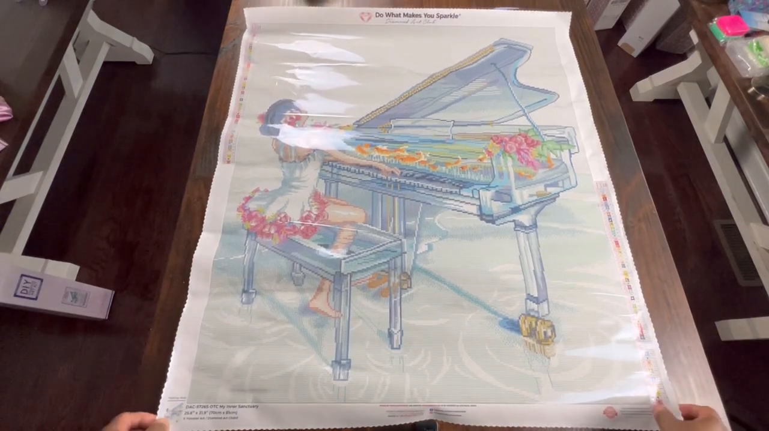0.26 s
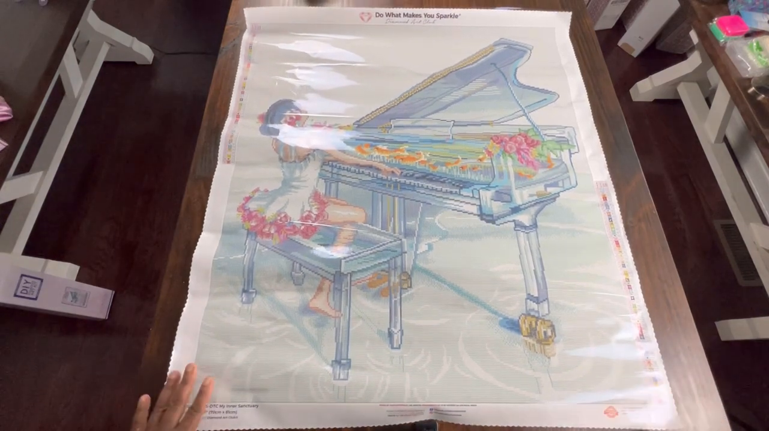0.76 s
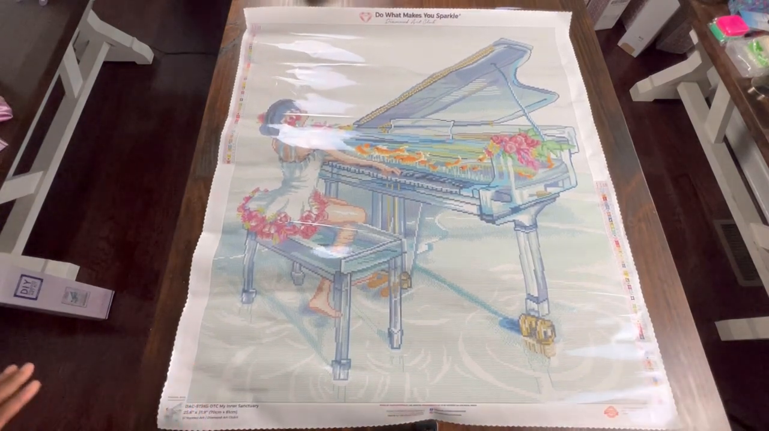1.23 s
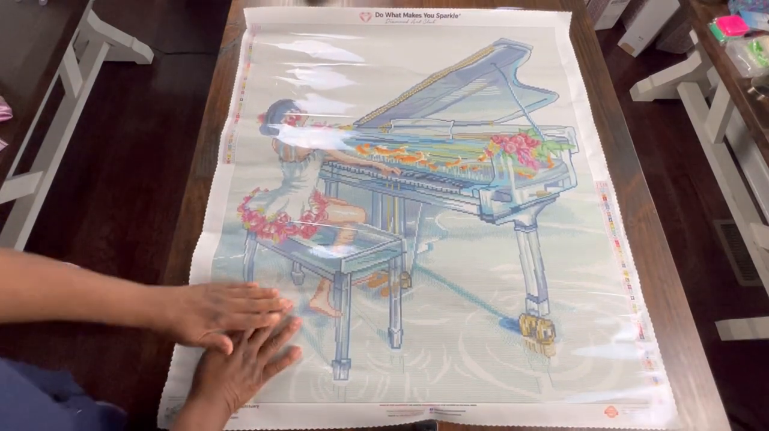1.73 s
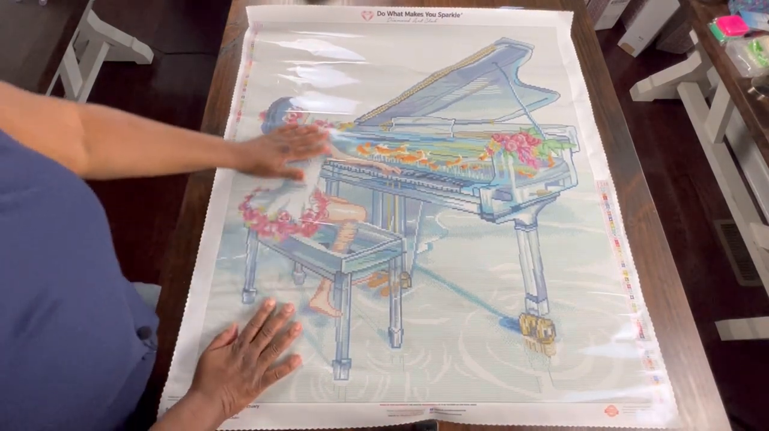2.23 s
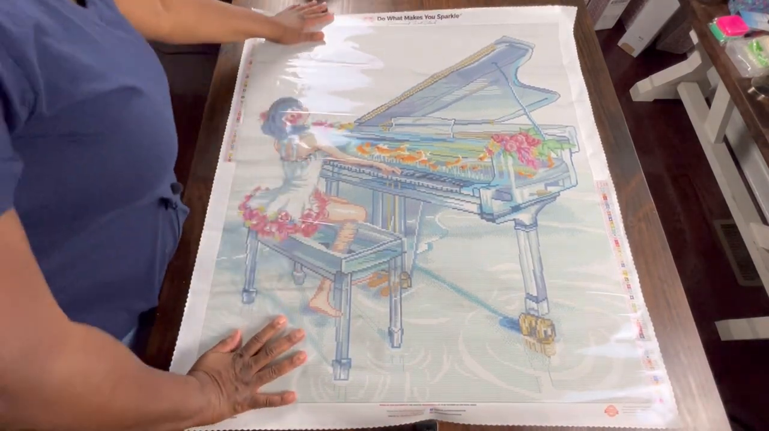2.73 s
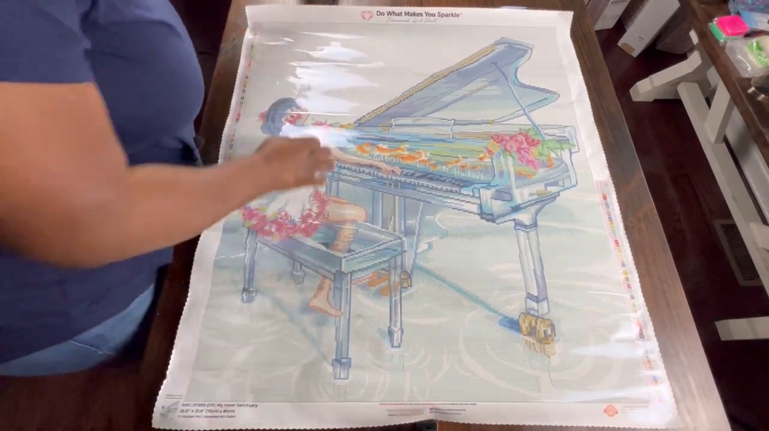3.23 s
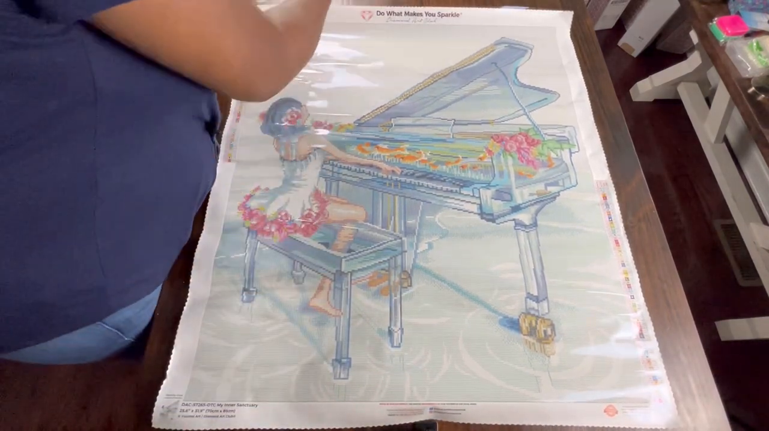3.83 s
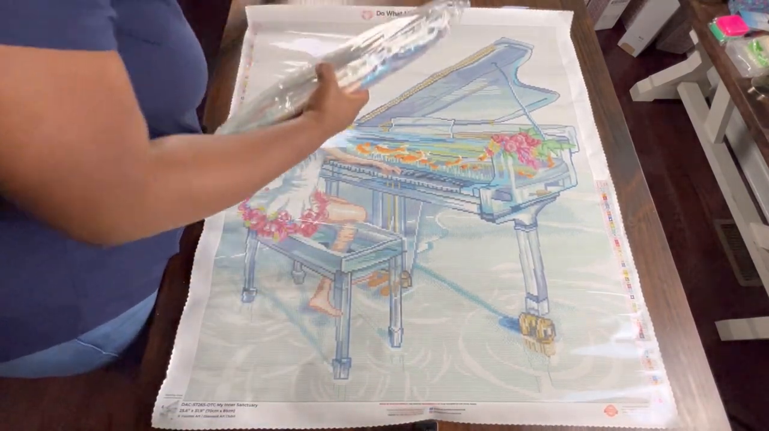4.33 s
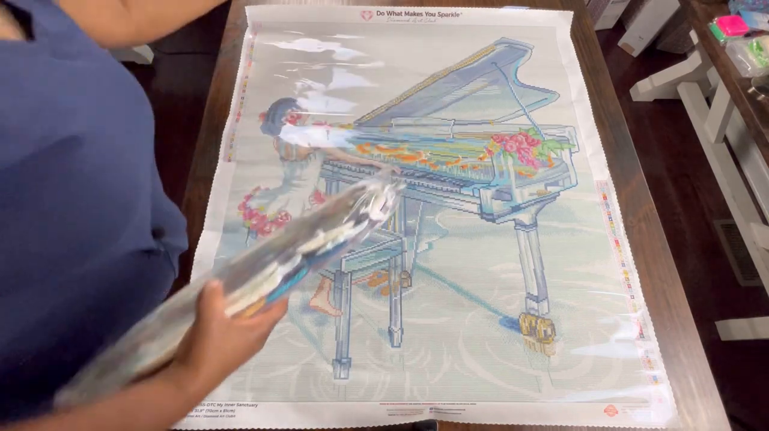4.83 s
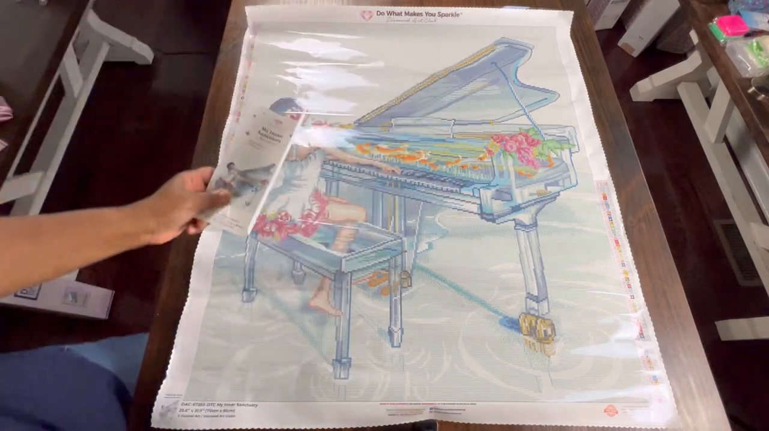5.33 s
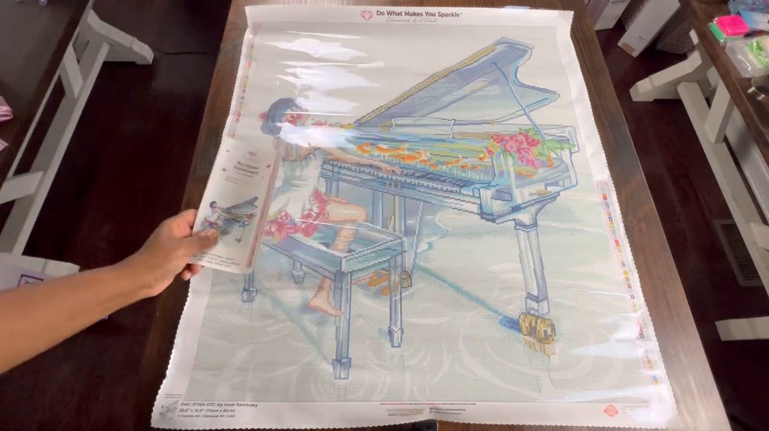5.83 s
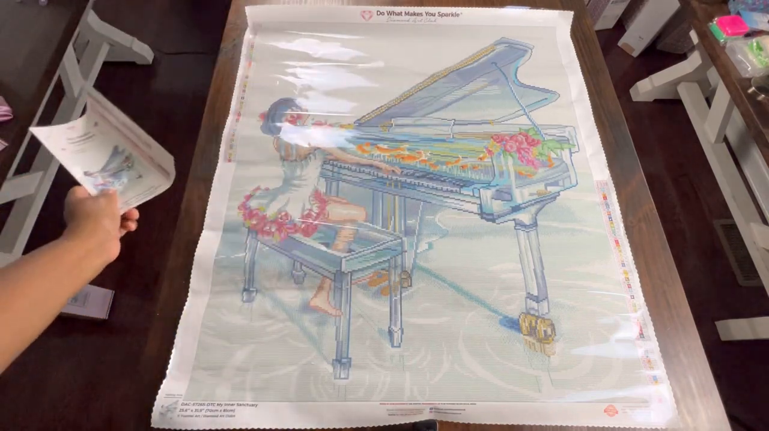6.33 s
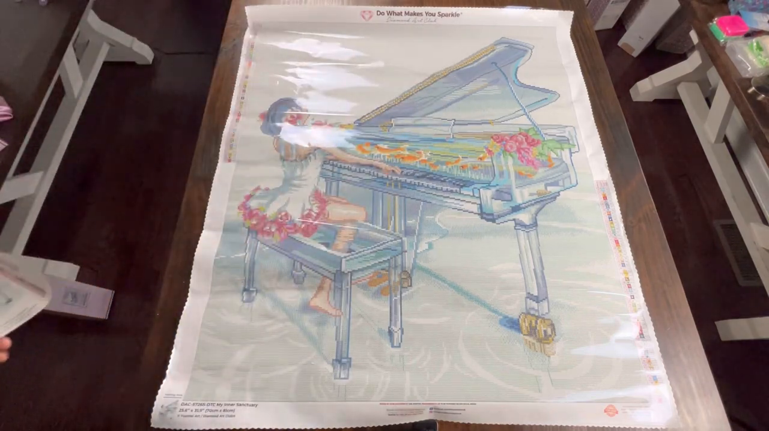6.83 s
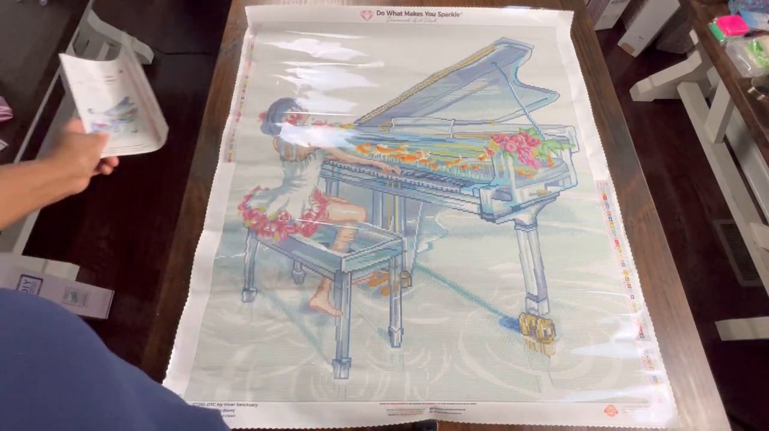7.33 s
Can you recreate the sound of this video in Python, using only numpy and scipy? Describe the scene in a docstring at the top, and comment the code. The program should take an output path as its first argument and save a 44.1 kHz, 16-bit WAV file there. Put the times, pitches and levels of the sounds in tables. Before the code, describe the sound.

Hands tug and smooth a canvas under crinkly plastic film, a wrapped roll scrapes and crackles loudly, then a leaflet flaps softly in a small room.

```python
"""Hands flatten a canvas under clear plastic film on a wooden table in a small room, tugging at its corners.
From 1.8 s a palm hisses across the film; from 3 s a plastic-wrapped roll is dragged up and carried off.
From 5.2 s a leaflet is waved about. Rubbing is coloured crackle and hiss, shaped stroke by stroke.
Throughout, creases snap as short bursts, blisters and sheets bend with gliding notes, and low air flutters.
A stereo microphone pair hears it with the room's reflections, over a faint hush."""
import sys
import numpy as np
from scipy import signal
from scipy.fft import rfft, irfft
from scipy.io import wavfile
from scipy.ndimage import uniform_filter1d

SR = 44100
rng = np.random.default_rng(int(sys.argv[2]) if len(sys.argv) > 2 else 0)


def pcm_store(signal):
    """Save signal as 16-bit PCM."""
    levels = np.round(np.clip(np.atleast_2d(signal), -1, 1) * 32767)
    wavfile.write(sys.argv[1], SR, levels.astype(np.int16).T)


N = 333396
TIME, HZ = np.arange(N) / SR, np.fft.rfftfreq(N, 1 / SR)
STEPS = np.arange(0, N, 64) / SR  # coarser clock for the hand movements (s)

# Strokes of the hands, levels before each source's trim:
# start_s, rise_s, hold_s, level_db, fizz_db (relative to level), tilt_db_per_octave, air_db
# fingers tugging the canvas corners
TUGS = [(0.0, 0.0033, 0.024, -52.5, -17, 1, -60.5), (0.205, 0.044, 0.022, -51.5, -22, 5, -64),
        (0.27, 0.019, 0.011, -51, -25, -2.8, -72), (0.455, 0.021, 0.092, -57, -24, 3.5, -68),
        (0.58, 0.0059, 0.0076, -50.5, -17, .5, -54), (0.79, 0.02, .01, -61.5, -24, 1.5, -80),
        (0.895, 0.031, 0.074, -53, -29, 0.5, -46.5), (1.055, 0.018, 0.12, -47.5, -32, 0.7, -56),
        (1.36, 0.2, 0.047, -55, -24, 2.5, -53), (1.52, 0.042, 0.098, -49.5, -32, -1, -56),
        (1.665, 0.017, 0.022, -42, -16.5, 1.9, -43)]
# the palm sweeping across the film, columns as above
SWEEPS = [(1.764, 0.1, 0.3, -48, -6, -3, -59.5), (2.106, 0.049, 0.079, -45.5, 0, 1.2, -49.5),
          (2.245, .08, 0.3, -47, -2, -0.05, -55.5)]
# the wrapped roll dragged and lifted, columns as above
ROLL_STROKES = [(3.006, 0.058, 0.098, -40.5, -15, 0.5, -58), (3.112, 0.035, 0.036, -34, -9.5, -1, -55),
                (3.171, 0.086, 0.13, -31, -12.5, -0.5, -57.5), (3.65, 0.045, 0.047, -31, -7, .5, -63),
                (3.725, 0.029, 0.033, -26.5, -13, 0.3, -53), (3.924, 0.016, 0.014, -44.5, -11, -2, -67),
                (4.074, 0.017, 0.013, -45, -38, -1, -76), (4.29, 0.045, 0.026, -50.5, -32, 3, -62.5),
                (4.391, 0.0077, 0.0071, -44, -22, 0, -74), (4.694, 0.019, .02, -50.5, -24, 0.5, -72),
                (4.805, 0.076, .02, -46, -27, -0.5, -56.5), (5.023, .04, 0.08, -55, -31, -1, -64)]
# the leaflet swung in the hand, columns as above
LEAFLET_STROKES = [(5.181, 0.05, 0.013, -44.5, -39, 0, -63), (5.552, 0.0094, 0.0092, -57, -32, 4, -80),
                   (5.711, 0.044, 0.027, -48.5, -30, 1.2, -57.5), (5.84, 0.03, 0.17, -50, -27, -0.3, -53.5),
                   (6.038, 0.027, 0.027, -43, -17, 1, -72), (6.146, 0.034, 0.027, -46, -21, 3, -76),
                   (6.297, 0.027, 0.045, -49, -25, -2, -52), (6.482, 0.081, 0.058, -48.5, -28, -0.5, -58),
                   (6.822, 0.018, 0.16, -58, -37, -2, -50.5), (7.082, .15, 0.094, -49.5, -32, -1.5, -60.5),
                   (7.339, 0.046, 0.096, -50, -32, 1, -53.5)]
# treble colour of fizzing film: frequency_hz, relative_db_per_hz
FIZZ_COLOUR = [(100, -60), (2000, -28), (5000, -30), (8000, -11.5), (10000, -12.5), (12500, -8),
               (15500, -7), (16300, -52)]


def canvas():
    """Fingers rub the corners of the canvas; then a palm skims the film with a thin hiss and presses down."""
    # rubbing colours of corners, skimmed film and pressed film: frequency_hz, relative_db_per_hz
    corner_colour = [(150, -43), (250, 6.5), (278, -4.5), (339, -16), (383, -2.5), (519, -12.5),
                     (1150, -5.5), (2140, -9.5), (2770, -14.5), (5010, -14.5), (9500, -24.5), (12400, -43),
                     (20900, -120)]
    skim_colour = [(120, -39), (200, -11), (427, -7.5), (600, -10), (661, -22), (815, -18), (1440, -2),
                   (1980, -6.5), (5760, 11), (9500, -6), (12400, -41), (20900, -120)]
    palm_colour = [(120, -34), (200, -7), (243, -1.5), (330, -6), (370, 1.5), (414, -4), (544, -4),
                   (884, -9), (1410, -3), (2410, -8), (6340, -2), (9500, -16), (12400, -42), (20900, -120)]
    tug_release_s, sweep_release_s = 0.077, 0.15  # time to fall to 1/e
    grains = crackle(per_s=5800, spread_db=0.5, hiss=0.95)
    corners = rustle(TUGS, tug_release_s, corner_colour, grains, fizz_db=2, judder_db=1.1)
    skim = rustle(SWEEPS, sweep_release_s, skim_colour, grains, fizz_db=4.0, judder_db=3.5)
    press = rustle(SWEEPS, sweep_release_s, palm_colour, grains, fizz_db=3.0, judder_db=0.8)
    pressed = np.interp(TIME, [2.06, 2.14], [0, 1])  # skimming gives way to pressing
    palm = np.sqrt(1 - pressed) * gain_of(0.9) * skim + np.sqrt(pressed) * gain_of(-0.1) * press
    creases = ticks(SWEEPS, sweep_release_s, per_s=51, spread_db=2.5, tick_db=-24)
    return gain_of(-3.0) * corners + palm + creases


def roll():
    """The roll's wrapper scrapes densely on the table, then crinkles in louder separate ticks when carried."""
    # rubbing colour of the wrapper: frequency_hz, relative_db_per_hz
    roll_colour = [(88, -59.5), (150, -22), (236, -5.5), (333, -5), (403, -2.5), (542, -4.5), (754, -4.5),
                   (912, -4), (1030, -1), (1430, -2), (1590, -1), (3130, -6), (6480, -1.5), (9500, -12),
                   (12400, -24.5), (20900, -120)]
    release_s = 0.11  # time to fall to 1/e
    grains = crackle(per_s=5500, spread_db=2.5, hiss=0.53)
    scrape = rustle(ROLL_STROKES, release_s, roll_colour, grains, fizz_db=2.0, judder_db=0.97)
    carried_db = np.interp(TIME, [3.85, 4.05], [0, 7])
    crinkles = ticks(ROLL_STROKES, release_s, per_s=55, spread_db=1.5, tick_db=-14)
    return gain_of(-0.03) * scrape + gain_of(carried_db) * crinkles


def leaflet():
    """Paper slides softly between the fingers and ticks as it flexes."""
    # rubbing colour of the paper: frequency_hz, relative_db_per_hz
    leaflet_colour = [(150, -59), (250, 9.5), (300, -15.5), (355, 3), (383, 1.5), (704, -5.5), (871, -1),
                      (1090, 1.5), (1840, 0.5), (3990, -4), (6900, -5.5), (9500, -15), (12400, -37),
                      (20900, -120)]
    release_s = 0.069  # time to fall to 1/e
    grains = crackle(per_s=6000, spread_db=1, hiss=1.0)
    slide = rustle(LEAFLET_STROKES, release_s, leaflet_colour, grains, fizz_db=0.0, judder_db=2.5)
    flexing = ticks(LEAFLET_STROKES, release_s, per_s=25, spread_db=1, tick_db=-15.5)
    return gain_of(-3.0) * slide + flexing


def rustle(rows, release_s, colour, grains, fizz_db, judder_db):
    """Rubbed sheet: coloured crackle, brighter when rubbed sharply, catching and slipping unevenly."""
    level_db, fizz, _ = strokes(rows, release_s)
    hz, t, z = signal.stft(coloured(grains, colour), SR, nperseg=256)
    octaves = np.log2(np.clip(hz, 400, 9000) / 2500)[:, None]
    tilt_db = octaves * strokes(rows, release_s, t)[2]
    body = signal.istft(z * gain_of(tilt_db), SR, nperseg=256)[1][:, :N]
    fizzing = gain_of(fizz + fizz_db) * coloured(grains, FIZZ_COLOUR)
    judder = evened(uniform_filter1d(rng.standard_normal(N), size=500))
    return gain_of(level_db + judder_db * judder) * (body + fizzing)


def crackle(per_s, spread_db, hiss, cycles=1.25, count=16, size=14):
    """Tiny facets buckle at random places, each ringing a cycle or two, over the smooth hiss of sliding."""
    t, out = np.arange(192) / SR, np.zeros((2, N))
    smooth = rng.standard_normal((2, N))
    for hz in np.geomspace(700, 15000, count):
        chance = per_s / count / SR * np.sqrt(hz / 4000)  # small facets are the more numerous
        at = np.flatnonzero(rng.random(N) < chance)
        draws = rng.random((N // 20, 3))
        strength, sign, place = draws[np.arange(len(at)) % (N // 20)].T
        sizes_db = spread_db * np.minimum(-np.log(1 - strength), 4.5)
        sizes = gain_of(sizes_db) * np.sign(sign - .5)
        # mostly on the left, so the right hears them later (lags in samples)
        lags = np.round(size * (2 * place - .5)).astype(int)
        clicks = np.array([np.bincount(at, sizes, N), np.bincount((at + lags) % N, sizes, N)])
        ring = np.exp(-t * hz / cycles) * np.sin(2 * np.pi * hz * t)
        rung = signal.oaconvolve(clicks, ring[None], axes=1)[:, :N]
        out += np.sqrt(hz) * evened(rung)
    return evened(evened(out) + hiss * smooth)


def ticks(rows, release_s, per_s, spread_db, tick_db):
    """Now and then a tiny crease lets go on its own, louder when the sheet is handled harder."""
    sizes = gain_of(spread_db * np.minimum(rng.exponential(1, N), 2.5)) * (rng.random(N) < per_s / SR)
    level_db, fizz, _ = strokes(rows, release_s)
    bright = gain_of(fizz + 16.0) * coloured(sizes, FIZZ_COLOUR)
    dull_colour = [(300, -27), (1500, 5), (7000, 2.0), (11000, -28)]  # frequency_hz, relative_db
    dull = gain_of(-16.0) * coloured(sizes, dull_colour)
    return gain_of(level_db + tick_db) * (bright + dull)


def push(rows, times, release_s):
    """How hard each stroke pushes, 0-1: a straight rise, a hold and an exponential release."""
    start, rise, hold = np.transpose(rows)[:3, :, None]
    age = times - start
    released = np.maximum(age - rise - hold, 0)
    return np.clip(age / np.maximum(rise, .002), 0, 1) * np.exp(-released / release_s)


def strokes(rows, release_s, times=TIME):
    """Level dB, fizz dB and tilt of overlapping strokes: powers add, and the strongest dominates the colour."""
    fizz_power = 0.63  # the fizz's share of the sound goes with this power of the push
    db, fizz_db, tilt = np.transpose(rows)[3:6, :, None]
    force = push(rows, STEPS, release_s)
    power = (force * gain_of(db)) ** 2 + 1e-16
    total = power.sum(0)
    share = power / total
    fizz = (share * (gain_of(fizz_db) * force ** fizz_power) ** 2).sum(0) + 1e-16
    curves = 10 * np.log10(total), 10 * np.log10(fizz), (share * tilt).sum(0)
    return [np.interp(times, STEPS, curve) for curve in curves]


def snaps(ring_db=4.5, stiffness=0.16, ring_width=0.17, treble_db=3, rattle=0.41, thin_db=5, size=2048):
    """A crease flips with a click and a brief rattle, coloured by the ring of its patch of sheet."""
    # creases snapping, before the trim: start_s, level_db, ring_hz, relative treble_db, rattle decay_s
    creases = [(0.029, -45, 6840, 5, .0014), (0.123, -36, 3600, -38, 0.0023),
               (0.587, -34, 3150, -32, .0007), (0.5945, -31.5, 3610, -24, .0018),
               (0.601, -30.5, 1900, -18, 0.0012), (1.0941, -30, 2120, -50, 0.0013),
               (1.6846, -31, 2650, -28, .0015), (1.692, -36, 2840, -9, .0012), (1.774, -36, 2110, 7, .0012),
               (1.806, -29.5, 6450, 6, 0.0028), (1.8771, -27.5, 6400, 4, 0.0021),
               (1.9175, -32, 7040, 8, .0013), (1.982, -24.5, 11900, -8, .0014),
               (2.0732, -30, 11800, 0, 0.0018), (2.203, -28.5, 5970, -20, 0.0039),
               (2.5586, -23.5, 15300, 10, .0008), (2.6502, -30, 6600, 5, 0.0022),
               (3.017, -38, 5400, 19, 0.0013), (3.1818, -19.5, 11800, -2, .0012),
               (3.678, -13, 2040, -30, 0.00079), (3.75, -14, 5100, -21, 0.0011),
               (4.0030, -22, 3870, -8, 0.0013), (4.1, -22, 5200, -11, 0.0015),
               (4.2191, -33, 2140, -26, .0032), (4.405, -26.5, 5670, -13, 0.0044),
               (4.6769, -37.5, 2050, -35, 0.0014), (4.7109, -26.5, 5330, 13, 0.0017),
               (4.835, -37, 2080, -22, .0012), (4.852, -26, 6260, -3, .0017),
               (4.8989, -22, 1690, -7, 0.0009), (4.9102, -24, 5230, -15, 0.0016),
               (4.9295, -24, 5140, 9, 0.0017), (5.1454, -18, 2450, -35, 0.00088),
               (5.153, -41, 2380, -36, .0012), (6.0662, -28, 2070, -11, .0014),
               (6.1732, -34, 2380, -12, 0.0023), (6.2084, -33.5, 2120, -7, 0.0013),
               (6.2298, -36, 3750, -38, .005), (7.2542, -31.5, 2280, -60, 0.0013)]
    out, t, hz = np.zeros((2, N)), np.arange(size) / SR, np.fft.rfftfreq(size, 1 / SR)
    # frequency_hz, relative_db
    sheet_db = read([(100, -5), (500, -6), (1200, 5.0), (3500, 3.5), (6500, 4), (10000, -2), (16000, -4.0)], hz)
    top = read([(3000, 0.23), (7000, 0.31), (11000, 0.71)], hz)  # frequency_hz, share of treble_db
    noises = rng.standard_normal((len(creases), 2, size))
    for (s, db, ring_hz, treble, decay), noise in zip(creases, noises):
        envelope = np.exp(-t / max(decay, 1e-4))
        peak_db = ring_db - stiffness * min(treble, 0)  # dull, stiff creases ring more
        ring = peak_db / (1 + (np.log((hz + 1) / ring_hz) / ring_width) ** 2)
        # a small patch radiates little far below its ring
        thin = thin_db * np.log2(np.clip(2 * hz / ring_hz, 1 / 8, 1))
        log_gain = np.log(gain_of(sheet_db + ring + thin + top * (treble + treble_db)))
        # minimum phase, so the sound starts with the click
        causal = np.exp(np.conj(signal.hilbert(np.r_[log_gain, log_gain[-2:0:-1]])))[:len(hz)]
        burst = irfft((1 + rfft(rattle * noise * envelope)) * causal)
        burst *= gain_of(db) * np.linalg.norm(envelope) / np.linalg.norm(burst, axis=1, keepdims=True)
        add(out[0], s, burst[0])
        add(out[1], s + .0001 * abs(noise[1, -1]), burst[1])  # the right hears it slightly later
    return gain_of(-2.5) * out


def pops():
    """Small blisters of film flip over quickly with a hollow note."""
    # blisters popping, before the trim: start_s, level_db, settled pitch_hz, decay_s
    blisters = [(0.123, -47.5, 1267, 0.0048), (0.587, -40, 1466, 0.0066), (1.096, -38, 1470, 0.0089),
                (1.605, -45, 764, 0.008), (1.684, -34.5, 1320, 0.0044), (1.794, -35.5, 1090, 0.0037),
                (1.814, -30.5, 960, 0.0023), (2.070, -46.5, 715, 0.019), (3.135, -31, 526, 0.0043),
                (4.108, -35.5, 1320, 0.0029), (4.135, -41, 910, 0.005), (4.929, -36.5, 1236, 0.0029),
                (5.323, -45, 422, 0.0033), (5.560, -42.5, 694, 0.003), (5.561, -53, 990, 0.039),
                (6.173, -40, 680, 0.0017), (6.312, -41.5, 1200, 0.0047), (6.313, -53, 1910, 0.0086),
                (6.830, -55, 640, 0.021)]
    puff = [(200, -6), (600, -2.5), (1300, 4), (2000, -28.0), (5000, -37)]  # frequency_hz, relative_db
    notes = wobbles(blisters, rise_s=0.00073, bend_hz=108, glide_s=0.016,
                    puff=puff, puff_db=-7.0, overtones_db=1.0)
    return gain_of(-2.5) * notes


def flops():
    """Hands land softly and whole sheets slap down or swing over, as low gliding notes with a puff of air."""
    # soft blows, before the trim: start_s, level_db, settled pitch_hz, decay_s
    blows = [(0.280, -51.5, 353, 0.038), (0.604, -37.5, 126.5, 0.029), (0.950, -43, 143.5, 0.024),
             (1.010, -39.5, 138, 0.015), (1.038, -40, 138, 0.027), (1.482, -49.5, 150, 0.032),
             (1.604, -38.5, 461, 0.012), (1.612, -43, 165, 0.024), (1.635, -41, 62, 0.034),
             (1.699, -39, 60.4, 0.066), (2.838, -56, 232, .014), (3.135, -27, 78, 0.02),
             (4.822, -49.5, 183, 0.016), (5.028, -47, 129, 0.025), (5.225, -55, 63, 0.026),
             (5.885, -46, 120.5, 0.026), (6.313, -39.5, 334, 0.024), (6.326, -32.5, 122, .016),
             (6.352, -38.5, 279, 0.02), (6.829, -38.5, 226, 0.023), (6.838, -47.5, 469, .02),
             (6.846, -39.5, 125.7, 0.032)]
    # frequency_hz, relative_db
    puff = [(40, -2), (110, 12), (320, 8.5), (500, -2.5), (1000, -40), (2500, -31)]
    notes = wobbles(blows, rise_s=0.012, bend_hz=77.4, glide_s=0.0114,
                    puff=puff, puff_db=-7.5, overtones_db=-9.5)
    return gain_of(-4.5) * notes


def wobbles(rows, rise_s, bend_hz, glide_s, puff, puff_db, overtones_db):
    """A patch of sheet bends over: its notes glide down as the tension changes, with a puff of air."""
    # ringing of a bending sheet: factor (on its lowest note), relative_db
    sheet_modes = [(1, -0.5), (1.6, -8), (2.3, -21), (3.4, -9.5)]
    out, t = np.zeros(N), np.arange(SR // 3) / SR
    air = gain_of(puff_db) * coloured(rng.standard_normal(N), puff)
    for s, db, hz, decay in rows:
        turns = np.cumsum(hz + bend_hz * np.exp(-t / glide_s)) / SR
        fade = np.exp(-t / max(decay, .002))
        envelope = (1 - np.exp(-t / rise_s)) * fade
        sound = air[round(s * SR):][:len(t)]
        for k, (factor, mode_db) in enumerate(sheet_modes):
            gain = gain_of(mode_db + overtones_db * (k > 0))
            # higher notes die sooner
            sound = sound + gain * fade ** (k / 2) * np.sin(2 * np.pi * factor * turns)
        add(out, s, gain_of(db) * envelope / envelope.max() * sound)
    return out


def flutter():
    """Low lumpy air from the sheets, which follows each stroke late and settles slowly."""
    # colour of the moving air: frequency_hz, relative_db_per_hz
    flutter_colour = [(15, -35), (25, -15), (60, 4), (74, -4), (97, -1.5), (134, 1), (277, -16), (325, -9),
                      (450, -37), (580, -44.5), (990, -120)]
    lag_s, release_s = 0.014, 0.13
    rows = np.vstack([TUGS, SWEEPS, ROLL_STROKES, LEAFLET_STROKES])
    sway = gain_of(rows[:, -1:]) * push(rows, STEPS - lag_s, release_s)
    strength = np.interp(TIME, STEPS, np.linalg.norm(sway, axis=0))
    return gain_of(-5.0) * strength * coloured(rng.standard_normal(N), flutter_colour)


def room(x, wet_db):
    """The direct sound, dense reflections that die band by band, and one low standing wave."""
    # reverberation: frequency_hz, t60_s
    room_t60 = [(100, 0.47), (300, 0.3), (1500, 0.33), (6000, 0.33), (10000, 0.13), (16000, 0.061)]
    # standing wave: frequency_hz, t60_s, level_db
    room_mode = (277, 1, -33.5)
    taps = rng.standard_normal((2, SR // 2)) * (rng.random((2, SR // 2)) < .12)
    taps[:, :SR // 400] = 0  # no reflection in the first 2.5 ms
    hz, t, z = signal.stft(taps, SR, nperseg=256)
    # frequency_hz, relative_db
    walls_db = read([(100, -7.0), (1200, -0.5), (7000, -0.5), (11000, 7.5), (16000, -10.5)], hz)[:, None]
    decay_db = -60 * t / read(room_t60, hz)[:, None]
    tail = signal.istft(z * gain_of(walls_db + decay_db), SR, nperseg=256)[1]
    tail *= gain_of(wet_db) / np.linalg.norm(tail, axis=1, keepdims=True)
    mode_hz, t60, mode_db = room_mode
    age = TIME[:tail.shape[1]]
    mode = gain_of(-60 * age / t60) * np.cos(2 * np.pi * mode_hz * age)
    tail += gain_of(mode_db) * mode / np.linalg.norm(mode)
    return x + signal.fftconvolve(np.atleast_2d(x), tail, axes=1)[:, :N]


def room_hush():
    """The quiet of the room: steady coloured noise, independent on the two sides."""
    # colour of the quiet: frequency_hz, relative_db_per_hz
    hush_colour = [(15, -28.5), (25, 12), (93, -2.5), (673, -7), (1420, 1), (2130, -7), (6900, -12),
                   (12100, -25), (13800, -52), (15000, -29)]
    return gain_of(-66) * coloured(rng.standard_normal((2, N)), hush_colour)


def gain_of(db):
    """Decibels to amplitude."""
    return 10 ** (np.asarray(db) / 20)


def evened(x):
    """Scales to unit rms."""
    return x / np.sqrt(np.mean(x ** 2) + 1e-20)


def read(points, hz):
    """Reads a table on a log-frequency axis."""
    f, value = np.transpose(points)
    return np.interp(np.log(hz + 1), np.log(f + 1), value)


def coloured(x, spectrum):
    """Filters x by a spectrum table, at unit rms."""
    return evened(irfft(rfft(x) * gain_of(read(spectrum, HZ)), N))


def add(mix, s, sound):
    """Mixes a sound in at time s."""
    part = mix[max(round(s * SR), 0):][:len(sound)]
    part += sound[:len(part)]


def scene():
    """All the handling in the room, over its faint hush."""
    rubbing = gain_of(-0.5) * room(canvas() + roll() + leaflet(), wet_db=-5.5)
    snapping = room(snaps(), wet_db=-2.0)
    popping = room(pops(), wet_db=2.5)
    flopping = room(flops() + flutter(), wet_db=-3.5)
    return rubbing + snapping + popping + flopping + room_hush()


def record(dry):
    """The pair partly shares the bass and, with a turning phase, the top treble; the left is the brighter."""
    # microphone balance: frequency_hz, left_minus_right_db
    balance = [(60, 4), (200, 3.5), (1400, 4), (2400, 2.5), (4000, 7), (5300, 10.5), (7000, 11),
               (8300, 3.5), (9600, -2.5), (11000, -0.5), (16000, 0)]
    # sound common to both microphones: frequency_hz, share (0-1)
    common_share = [(150, 0.35), (300, 0), (550, 0), (9000, 0), (10300, 0.78), (11400, 1)]
    in_step_hz, phase_turn_hz = 12050, 3480  # where the sides agree, and the span of one full phase turn
    left, right = rfft(dry)
    common = np.clip(read(common_share, HZ), 0, 1)
    turn = np.exp(2j * np.pi * (HZ - in_step_hz) / phase_turn_hz * (HZ > SR / 8))
    right = common * turn * left + np.sqrt(1 - common ** 2) * right
    lean = gain_of(read(balance, HZ))
    pair = irfft(np.array([left * lean, right]) * np.sqrt(2 / (1 + lean ** 2)), N)
    # nothing above the top edge of 16.4 kHz
    low_pass = signal.firwin(511, 16400, window=("kaiser", 9), fs=SR)
    return signal.oaconvolve(pair, low_pass[None], "same")


dry = scene()
out = record(dry)
pcm_store(out)
```